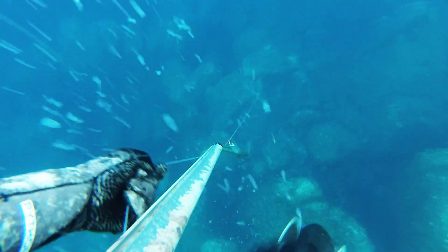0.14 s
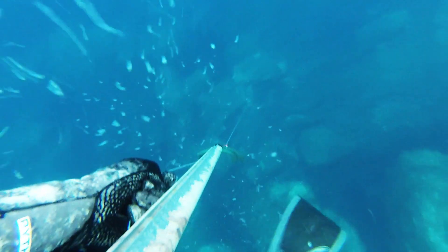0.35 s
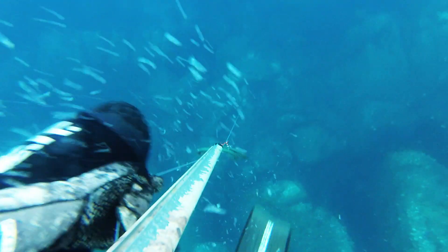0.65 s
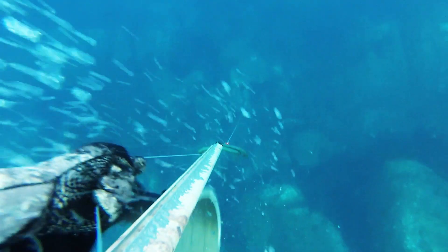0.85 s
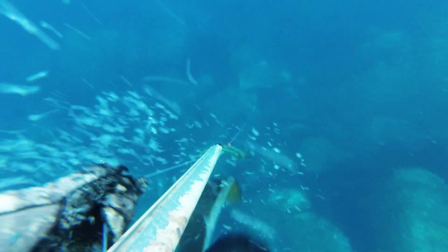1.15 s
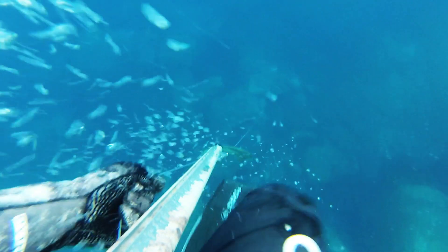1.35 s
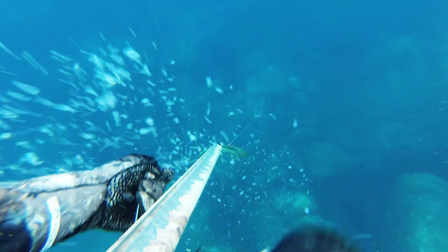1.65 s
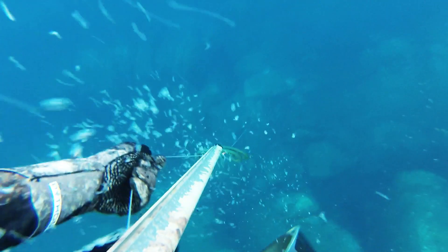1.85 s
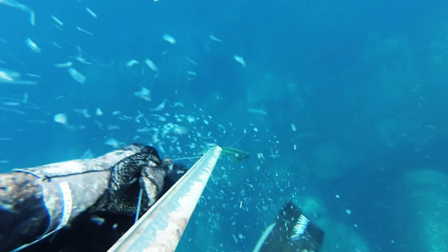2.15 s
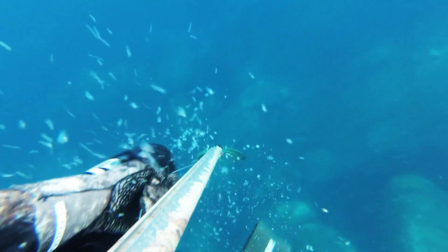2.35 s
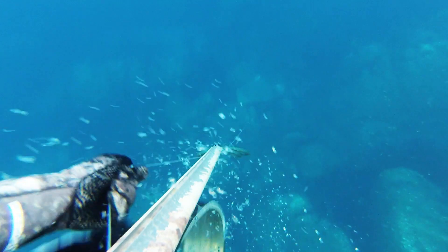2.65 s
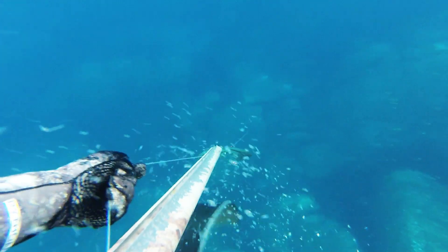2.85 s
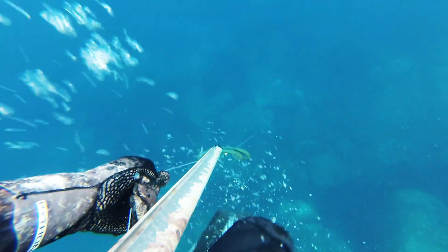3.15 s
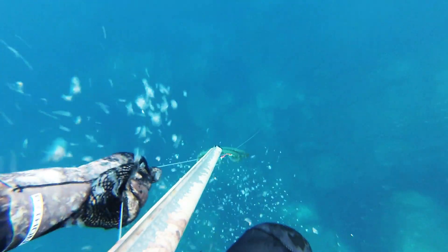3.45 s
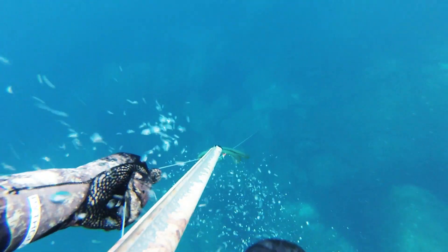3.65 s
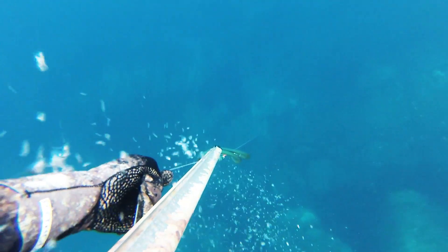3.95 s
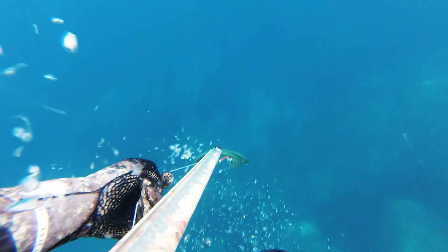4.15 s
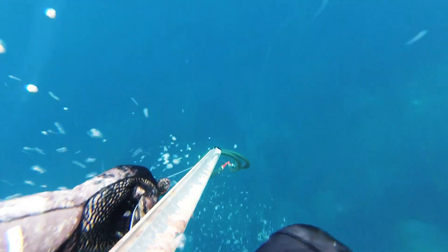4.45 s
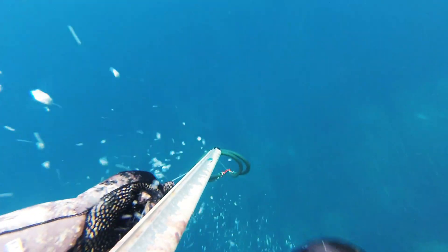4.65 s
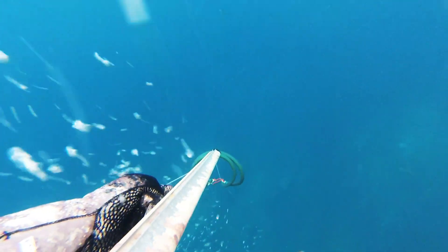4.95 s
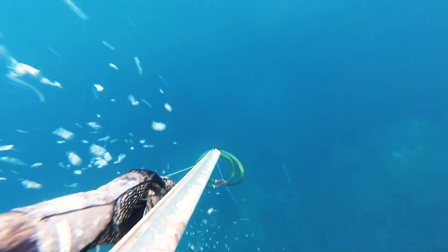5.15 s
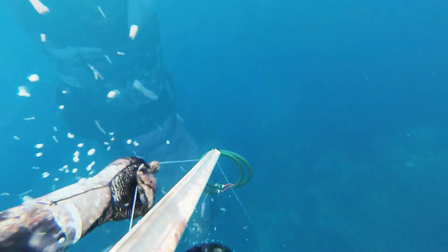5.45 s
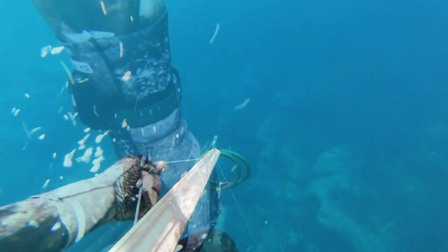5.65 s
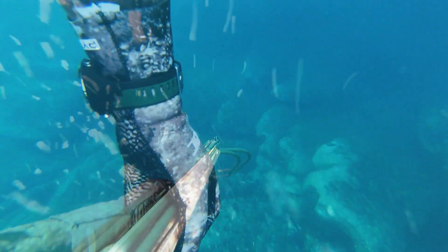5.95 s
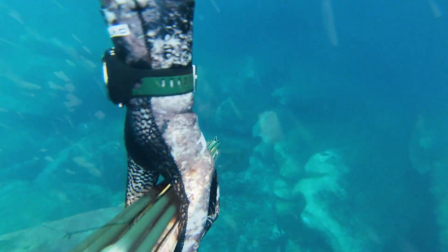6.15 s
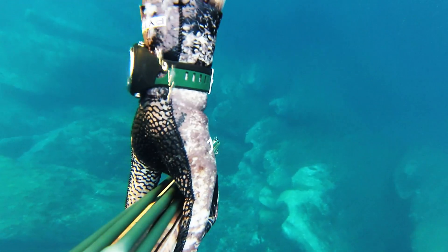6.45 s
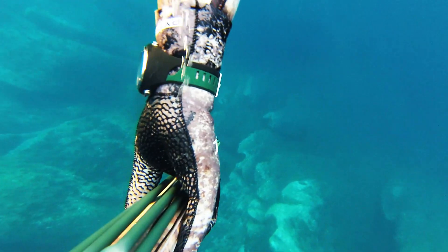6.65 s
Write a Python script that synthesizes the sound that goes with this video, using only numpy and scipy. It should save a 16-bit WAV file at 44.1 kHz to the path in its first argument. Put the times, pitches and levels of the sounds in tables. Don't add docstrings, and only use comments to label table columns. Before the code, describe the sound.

Eleven dull, pulsing underwater surges with rubbery rubbing and hollow thumps end in a hard knock, followed by soft swirling, tiny snaps and late gurgles.

```python
import sys
import numpy as np
from scipy import signal
from scipy.io import wavfile
from scipy.ndimage import uniform_filter1d

SR = 44100
rng = np.random.default_rng(int(sys.argv[2]) if len(sys.argv) > 2 else 0)


def to_wav(sig):
    pcm = np.clip(np.atleast_2d(sig), -1, 1) * 32767
    pcm = np.round(pcm).astype(np.int16)
    wavfile.write(sys.argv[1], SR, pcm.T)


def amplitude_ratio(level_db):
    exponent = np.asarray(level_db, float) / 20
    return 10 ** exponent


N = 300321

# start_s, fastest_s, end_s, top_note_hz, strength_db
STROKES = [(0.218, 0.318, .49, 1058, -52), (0.708, .82, 1.0, 992, -49.5), (1.211, 1.316, 1.48, 1085, -46.5),
           (1.645, 1.794, 2.03, 904.6, -45.5), (2.165, 2.296, 2.4, 817, -44.5),
           (2.521, 2.625, 2.83, 913, -45.5), (2.928, 3.084, 3.19, 860.4, -41.5),
           (3.273, 3.385, 3.57, 1008, -43), (3.692, 3.791, 3.95, 909.4, -44),
           (4.046, 4.143, 4.25, 905, -46.5), (4.431, 4.507, 4.61, 671.5, -47.5)]
# note_sag_hz_per_s, note_db, rubbing_db, water_push_db
GRIPS = [(5700, -49, -55, -49), (4510, -51.5, -57.5, -48.5), (6180, -50.5, -56.5, -42.5),
         (8250, -50, -61.5, -44), (5010, -49.5, -62.5, -38), (4335, -51.5, -58, -40.5),
         (7630, -47, -59, -43.5), (5500, -52, -58.5, -43.5), (5970, -53.5, -60, -46.5),
         (6500, -54.5, -58, -42), (5630, -49.5, -61.5, -48)]
# hz, width_hz, level_db
PORT = [(3160, 660, -2), (4950, 370, 6.5), (6430, 1500, -5.5), (8075, 400, 8.5), (10100, 440, -9),
        (10500, 280, 4)]


def rms_one(x):
    return x / np.sqrt(np.mean(x ** 2) + 1e-20)


def in_time(rows):
    s, *columns = np.transpose(rows)
    return [np.interp(np.arange(N) / SR, s, c) for c in columns]


def drift(rate):
    r = np.exp(-2 * np.pi * rate / SR)
    settle = 9000
    noise = rng.standard_normal(N + settle)
    return rms_one(signal.lfilter([1], [1, -2 * r, r * r], noise)[settle:])


def evened(x, seconds):
    return rms_one(x / np.sqrt(uniform_filter1d(x ** 2, int(seconds * SR)) + 1e-20))


def resonance(x, hz, width_hz):
    r = np.exp(-np.pi * width_hz / SR)
    poles = [1, -2 * r * np.cos(2 * np.pi * hz / SR), r * r]
    return signal.lfilter([(1 - r * r) / 2, 0, (r * r - 1) / 2], poles, x)


def body(x, peaks):
    return sum((-1) ** k * amplitude_ratio(db) * resonance(x, hz, width) for k, (hz, width, db) in enumerate(peaks))


def cut(x, hz, kind, order=2):
    return signal.sosfilt(signal.butter(order, hz, kind, fs=SR, output="sos"), x)


def add(out, s, sound):
    i = int(s * SR)
    out[i:i + len(sound)] += sound[:N - i]


def ring(hz, t60, rise):
    t = np.arange(int(1.5 * t60 * SR)) / SR
    return np.sin(2 * np.pi * hz * t) * amplitude_ratio(-60 * t / t60) * (1 - np.exp(-t / rise))


def hump(start, top, end, db, feel):
    t = np.arange(N) / SR - top
    start_db, end_db, power = feel
    away = np.where(t < 0, -t / (top - start), t / (end - top))
    return amplitude_ratio(db - np.where(t < 0, start_db, end_db) * np.minimum(away, 4) ** power)


def effort(feel, tops_db, rest_db, stir=None, lag=0):
    # start_s, end_s, housing_db, glove_db, pole_db
    stirs = [(-.05, 0.058, -50, -69, -47), (0.076, 0.226, -72, -93, -55.5), (1.875, 1.985, -64, -73, -51),
             (2.182, 2.27, -50, -65, -49), (3.613, 3.697, -57, -98, -56), (3.695, 3.775, -44.5, -69, -51),
             (3.894, 4.085, -53.5, -87, -54.5), (4.236, 4.377, -65, -70, -55),
             (4.984, 5.024, -51, -72, -49), (5.018, 5.51, -54, -86.5, -46), (6.196, 6.6, -88, -88, -91),
             (6.688, 6.88, -60.5, -62, -70)]
    rise_share, stir_feel = .3, (14, 14, 3.0)
    total = amplitude_ratio(rest_db)
    for (start, top, end, *_), db in zip(STROKES, tops_db):
        total = total + hump(start + lag, top + lag, end + lag, db, feel)
    if stir:
        for row in stirs:
            start, end = row[0], row[1]
            total = total + hump(start, start + rise_share * (end - start), end, row[stir], stir_feel)
    return 20 * np.log10(total)


def rush(level_db, peaks, lumps_db, lump_rate, cut_hz):
    shaking = rng.standard_normal(N) * amplitude_ratio(lumps_db * drift(lump_rate))
    rings = np.zeros(N)
    for k, peak in enumerate(peaks):
        rings += (-1) ** k * body(shaking * amplitude_ratio(3 * drift(14)), [peak])
    return amplitude_ratio(level_db) * evened(cut(rings, cut_hz, "low", order=6), 0.081)


def hiss(friction_db):
    # hz, rms_db
    whine_lines = [(13124, -101), (13157, -99), (13517, -104)]
    floor_db = -90.5
    t = np.arange(N) / SR
    white = rng.standard_normal(N)
    open_band = cut(cut(white, 830, "high"), 17300, "low", order=3)
    noise = rms_one(body(white, PORT) + amplitude_ratio(1.0) * open_band) * amplitude_ratio(1.2 * drift(60))
    out = noise * (amplitude_ratio(floor_db) + amplitude_ratio(-80 + 0.32 * (friction_db + 78.5)))
    for hz, db in whine_lines:
        out += amplitude_ratio(db + 2 + 2 * drift(3)) * np.sin(2 * np.pi * hz * t + .6 * drift(4))
    return out


def shrimp():
    # start_s, peak_db, brightest_hz
    near_snaps = [(.302, -50.5, 4600), (.494, -47, 7060), (.547, -42, 6200), (.6625, -44, 5100),
                  (1.6661, -52, 9250), (1.875, -51, 10100), (1.9083, -49.5, 8550), (1.9902, -51, 5460),
                  (2.2255, -53, 5500), (2.9362, -43.5, 5940), (3.054, -52, 8300), (3.6315, -49, 8250),
                  (3.7105, -52, 6550), (3.732, -52, 8300), (3.7772, -41, 4820), (3.8425, -42.5, 4900),
                  (3.8614, -49, 8500), (3.8844, -53, 7900), (4.0193, -51.5, 8060), (4.159, -51.5, 6360),
                  (4.1725, -50, 4670), (4.2038, -54.5, 4600), (4.9853, -50, 2970), (5.1846, -46.5, 7640),
                  (5.508, -50.5, 4700), (6.0901, -50.5, 5200), (6.189, -51, 5360), (6.7088, -52, 5140),
                  (6.7343, -46.5, 6430)]
    # start_s, brightest_hz
    faint_snaps = [(.0667, 6460), (0.2423, 3540), (.5226, 3410), (0.7335, 3500), (0.8887, 3900),
                   (1.328, 3560), (1.4525, 8050), (2.071, 6500), (2.602, 8600), (3.2945, 4840),
                   (3.3246, 10100), (4.542, 8300), (5.042, 8450), (5.3614, 6540), (5.4742, 5780),
                   (5.5563, 6300), (5.689, 7550), (5.7092, 4720), (5.75, 4860), (5.786, 7700),
                   (5.881, 5370), (5.952, 5700), (5.993, 5170), (6.1448, 4940), (6.237, 7460),
                   (6.337, 4930), (6.433, 7840), (6.5156, 7000)]
    faint_db = -56
    out, t = np.zeros(N), np.arange(600) / SR
    shape = amplitude_ratio(-60 * t / 0.0077) * (1 - np.exp(-t / 0.00034))
    rows = [*near_snaps, *[(s, faint_db, hz) for s, hz in faint_snaps]]
    for s, db, hz in rows:
        echo_s = 0.0026 + 0.0025 * np.tanh(rng.standard_normal())
        echo = np.roll(shape, int(SR * echo_s)) * amplitude_ratio(-6.5)
        burst = rng.standard_normal(600) * (shape + echo)
        broad = np.clip((hz - 3200) / 2500, .05, 1)
        wide = 0.29 * body(burst, PORT) + 0.18 * cut(burst, 1600, "high")
        snap = broad * wide + resonance(burst, hz, 0.14 * hz)
        add(out, s, amplitude_ratio(db) * snap / np.abs(snap).max())
    clicks = rng.random(N) < 40 * amplitude_ratio(2 * drift(1.5)) / SR
    far = clicks * amplitude_ratio(4 * rng.exponential(1, N).clip(0, 3)) * rng.choice([-1, 1], N)
    far = np.convolve(far, np.hanning(60))[:N] * rng.standard_normal(N)
    return out + amplitude_ratio(-65.0) * (body(far, PORT) + 0.56 * cut(far, 6440, "high"))


def sway(swirl_db, push_db):
    level_db = effort((54, 30, 1.26), push_db, swirl_db - 2.5, lag=.04)
    slow = cut(cut(rng.standard_normal(N), 32, "low", order=3), 11.3, "high")
    return amplitude_ratio(level_db) * evened(slow, 0.2)


def pole_rumble(swirl_db, push_db):
    # hz, width_hz, level_db
    pole_peaks = [(55.3, 15.5, -1.5), (89.6, 32, 2), (158, 15.1, 8), (190, 145, -14)]
    rest_db = -65 + 0.46 * (swirl_db + 55)
    level_db = effort((8.2, 10, 3.3), push_db, rest_db, stir=4)
    return rush(level_db, pole_peaks, lumps_db=9.0, lump_rate=9.9, cut_hz=480)


def housing_rumble(swirl_db, strength_db):
    # hz, width_hz, level_db
    housing_peaks = [(314.4, 45, 3.5), (482, 74, -7), (581, 63, -3.5), (800, 67, -9.5), (1000, 130, -6)]
    # hz, width_hz, level_db
    narrow_peaks = [(745, 32.4, 13.5), (800, 110, -21.5)]
    early_db, late_db, drop_s = -10.5, -13, 6.3
    rest_db = -74 + 0.27 * (swirl_db + 55)
    level_db = effort((15.7, 19, 3.3), strength_db, rest_db, stir=2)
    narrow_db, = in_time([(0, early_db), (drop_s - .1, early_db), (drop_s, late_db)])
    shell = rush(level_db, housing_peaks, lumps_db=2.5, lump_rate=30, cut_hz=750)
    return shell + rush(level_db + narrow_db, narrow_peaks, lumps_db=10.0, lump_rate=26.4, cut_hz=548)


def glove_rub(friction_db):
    # hz, width_hz, level_db
    glove_peaks = [(1220, 180, -0.5), (1700, 195, 3.5), (2153, 350, -4.5), (2350, 106, -2.5)]
    return rush(friction_db, glove_peaks, lumps_db=3.5, lump_rate=62, cut_hz=2780)


def swishes():
    # start_s, end_s, hz, width_hz, level_db
    brushes = [
        (5.002, 5.513, 1000, 297, -70.5),
        (5.03, 5.503, 1800, 900, -92),
        (5.726, 6.164, 609, 50.7, -77),
        (6.286, 6.7, 1700, 116, -80.5),
        (6.288, 6.406, 1790, 300, -78),
        (6.405, 6.59, 1530, 156, -80),
    ]
    out, noise = np.zeros(N), rng.standard_normal(N) * amplitude_ratio(0.83 * drift(17))
    for start, end, hz, width, db in brushes:
        band = noise[int(start * SR):int(end * SR)]
        band = resonance(resonance(band, hz, width), hz, width)
        add(out, start, amplitude_ratio(db) * rms_one(band) * signal.windows.tukey(len(band), .3))
    return out


def blips():
    # start_s, peak_db, hz
    pockets = [(.301, -47.5, 3030), (.302, -47.5, 5000), (1.925, -53, 2350), (3.095, -39, 764),
               (.52, -57.5, 2250), (.522, -55, 3450), (.58, -65, 1710), (.63, -63, 620), (.67, -59, 665),
               (1.027, -59.5, 847), (1.495, -63, 1170), (1.631, -70, 1340), (2.421, -69, 1250),
               (2.481, -66, 1180), (3.232, -66, 1230), (3.875, -54, 1067), (3.94, -64, 1090),
               (4.251, -62, 990), (4.307, -59.5, 1240), (4.65, -62.5, 1220), (4.74, -66, 1910),
               (4.81, -55, 1295), (4.858, -69, 1230), (4.946, -64.5, 1280), (6.547, -61.5, 2800),
               (6.627, -65, 2820)]
    # start_s, peak_db, hz, t60_s
    rung_blips = [(1.142, -37, 320, .028), (1.329, -24.5, 685, 0.032), (1.331, -31.5, 415, 0.032),
                  (1.362, -30, 774, 0.042), (1.812, -37, 800, 0.07), (1.9, -44.5, 800, 0.24),
                  (1.959, -41.5, 335, 0.16), (2.189, -23.5, 346, 0.022), (2.34, -55, 745, 0.36),
                  (2.655, -26, 747, 0.046), (2.76, -40.5, 756, 0.048), (3.415, -30.5, 767, 0.053),
                  (3.62, -56, 530, 0.12), (3.716, -33.5, 597, 0.17), (4.158, -29.5, 734, 0.073),
                  (4.25, -49.5, 470, 0.12), (4.32, -52, 548, 0.089), (5.15, -40.5, 313, 0.22),
                  (5.33, -31.5, 154.3, 0.19),
                  (5.881, -53, 2000, 0.0046), (6.092, -44.5, 1850, 0.0036), (6.277, -53.5, 1700, 0.039),
               (6.304, -48, 1490, 0.024), (6.331, -57, 1000, 0.032), (6.665, -59, 800, 0.066),
               (6.697, -56, 1650, 0.044), (6.715, -27, 574, 0.093), (6.722, -36.5, 765, 0.075),
               (6.737, -36, 1220, 0.045), (6.756, -52, 1510, 0.031), (6.77, -45.5, 620, 0.095),
               (6.774, -53, 2030, .026), (6.795, -41.5, 606, 0.077)]
    longest_t60_s, knee_hz, slope = 0.087, 1250, 1.8
    rows = rung_blips
    for s, db, hz in pockets:
        rows.append((s, db, hz, longest_t60_s * min((knee_hz / hz) ** slope, 1)))
    out = np.zeros(N)
    for s, db, hz, t60 in rows:
        apart, later = rng.standard_normal(2)
        neighbour = ring(hz * (1 + .07 * apart), .8 * t60, rise=1.5 / hz)
        add(out, s, amplitude_ratio(db + 4) * ring(hz, t60, rise=1.17 / hz))
        add(out, s + .004 * abs(later), amplitude_ratio(db - 5) * neighbour)
        add(out, s, amplitude_ratio(db - 6) * ring(1.9 * hz, 1.8 / hz, rise=0.1 / hz))
    return out


def knocks():
    # start_s, peak_db
    blows = [
        (1.3291, -18),
        (2.007, -45.5),
        (2.189, -41),
        (2.281, -37),
        (2.301, -36),
        (3.823, -36),
        (4.9866, -20.5),
        (6.653, -48.5),
    ]
    # hz, level_db, t60_s
    modes = [(356, -1, 0.025), (570, 6, 0.026), (760, -3, .025), (1000, -14.5, 0.032), (2050, -5, 0.011),
             (2410, -9, 0.012), (3730, -22.5, 0.0063), (5100, -35, .005)]
    out = np.zeros(N)
    for s, peak_db in blows:
        for hz, db, t60 in modes:
            mode_db = peak_db + db - 2.0 + 1.5 * rng.standard_normal()
            add(out, s, -amplitude_ratio(mode_db) * ring(hz, t60, rise=0.00093))
    return out


def strands():
    # multiple_of_note, level_db
    partials = [(.5, -14.5), (1, -4), (1.5, -20), (2, -16), (2.5, -28), (3, -30.5)]
    # hz, width_hz, level_db
    swells = [(745, 27.3, 21), (313, 11, 1), (1700, 110, 10)]
    climb, round_s = 1.05, .012
    lowest_hz, fade_hz, climbing_db = 230.4, 123, -4
    out, waver = np.zeros(N), 1 + .022 * drift(70)
    breakup = [amplitude_ratio(6 * np.tanh(drift(25))) for _ in partials]
    for (start, top, end, top_hz, _), (sag, db, *_) in zip(STROKES, GRIPS):
        at = np.arange(int(start * SR), int(end * SR))
        t = at / SR - top
        hz_per_s = np.where(t < 0, climb * top_hz / (top - start), sag)
        hz = top_hz - hz_per_s * (np.hypot(t, round_s) - round_s)
        turn = 2 * np.pi * np.cumsum(np.maximum(hz, lowest_hz) * waver[at]) / SR
        note = np.zeros(len(at))
        for (multiple, part_db), grip in zip(partials, breakup):
            note += amplitude_ratio(part_db) * grip[at] * np.sin(multiple * turn)
        level = amplitude_ratio(db + climbing_db * np.clip(-t / round_s / 2, 0, 1))
        fade = np.clip((hz - lowest_hz) / fade_hz, 0, 1) * signal.windows.tukey(len(at), .2)
        out[at] = note * level * fade
    return out + sum(amplitude_ratio(db) * resonance(out, hz, width) for hz, width, db in swells)


def scene():
    # time_s, level_db
    swirl_points = [(0, -50), (.6, -49), (1.1, -48), (2.0, -48.5), (3.0, -46.5), (3.7, -48), (4.3, -45),
                    (4.7, -54), (5.0, -52), (5.1, -44.5), (5.5, -48), (5.6, -55), (6.22, -64), (6.55, -61),
                    (6.81, -59.5)]
    swirl_db, = in_time(swirl_points)
    strength_db = np.transpose(STROKES)[-1]
    _, _, rubbing_db, push_db = np.transpose(GRIPS)
    glove_rest_db = -85 + 0.68 * (swirl_db + 55)
    friction_db = effort((26.7, 29.4, 1.65), rubbing_db, glove_rest_db, stir=3)
    mono = hiss(friction_db) + shrimp()
    mono += sway(swirl_db, push_db) + pole_rumble(swirl_db, push_db)
    mono += housing_rumble(swirl_db, strength_db) + glove_rub(friction_db)
    mono += swishes() + blips() + knocks() + strands()
    return np.array([mono, mono])


def flutter(x):
    edges_hz = [13000, 13900, 14600, 15100]
    opens_at = [-2.0, -1.1, -.3, .8]
    wander, out = drift(9), x.copy()
    above = []
    for hz in edges_hz:
        high = signal.cheby2(8, 30, hz, "high", fs=SR, output="sos")
        above.append(signal.sosfiltfilt(high, x))
    for upper, higher, level in zip(above, above[1:] + [0], opens_at):
        out -= (upper - higher) * uniform_filter1d(1. * (wander < level), size=400)
    return out


def band_limit(x):
    return signal.sosfilt(signal.butter(12, 15750, fs=SR, output="sos"), x)


def record(dry):
    unlike = amplitude_ratio(-33.5) * cut(dry[0], 150, "high", order=1) * drift(34)
    unlike += amplitude_ratio(-17.5) * cut(dry[0], 3100, "high") * drift(470)
    stereo = flutter(dry + unlike * np.array([[1], [-1]]))
    top = signal.cheby2(10, 50, 15750, fs=SR, output="sos")
    return band_limit(signal.sosfilt(top, stereo))


dry = scene()
out = record(dry)
to_wav(out)
```